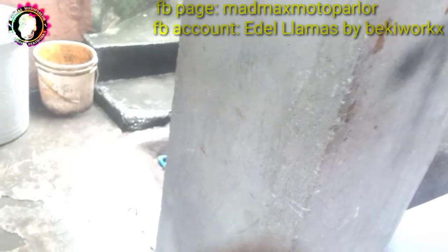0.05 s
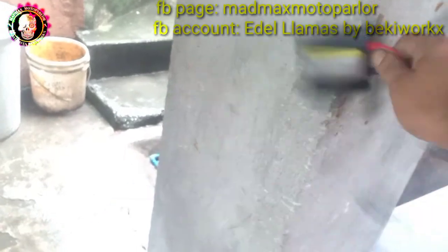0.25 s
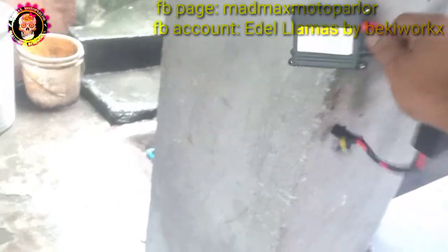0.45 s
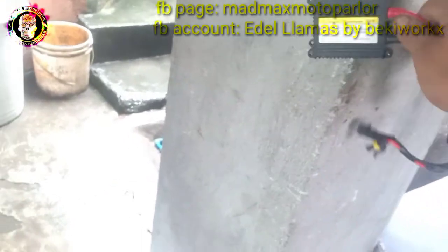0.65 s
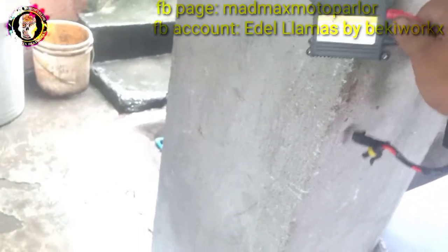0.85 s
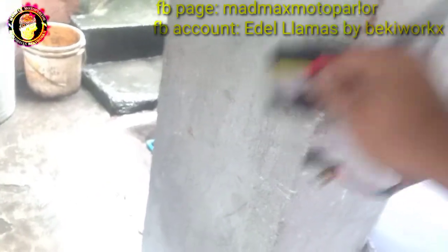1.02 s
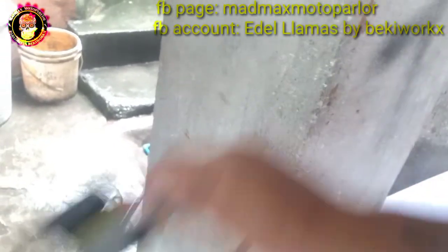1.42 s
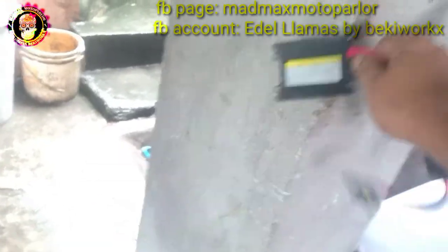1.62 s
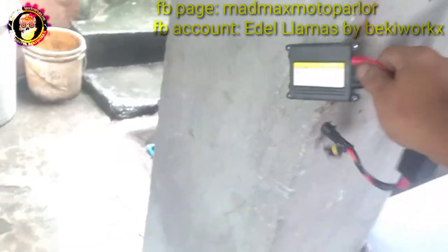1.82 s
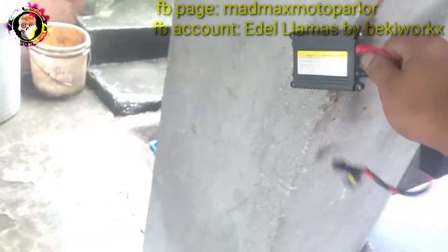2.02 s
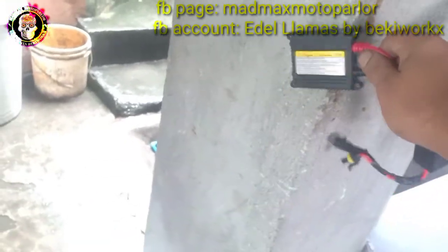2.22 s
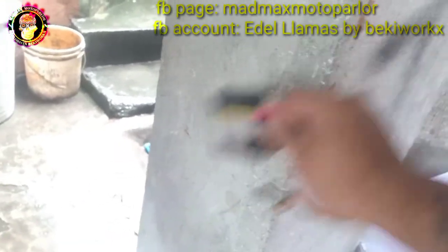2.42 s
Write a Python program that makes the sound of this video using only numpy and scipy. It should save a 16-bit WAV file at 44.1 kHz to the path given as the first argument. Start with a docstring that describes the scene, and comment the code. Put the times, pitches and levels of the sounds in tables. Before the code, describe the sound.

A small hard box is slammed twice onto a concrete slab in a quiet yard. Each sharp crack briefly overloads the close microphone and is followed by lighter rebound knocks, with a short echo and faint outdoor air.

```python
"""In a walled yard, a small hard-cased box, swung by its cable, is slammed twice onto a concrete slab.
Each slam lands edge first, then flat a few milliseconds later: the impacts excite the damped modes of the
case, crunch the concrete and overload the microphone with a low thud. The box rebounds and knocks
more lightly. Reflections ring on briefly over soft rustles, outdoor air, a distant hiss and a faint hum."""
import sys
import numpy as np
from scipy import signal
from scipy.fft import rfft, irfft, next_fast_len
from scipy.io import wavfile
from scipy.ndimage import uniform_filter1d

SR = 44100
rng = np.random.default_rng(int(sys.argv[2]) if len(sys.argv) > 2 else 0)


def int16_out(signal):
    """Quantize to a 16-bit WAV file."""
    q = np.round(np.clip(np.atleast_2d(signal).T, -1, 1) * 32767)
    wavfile.write(sys.argv[1], SR, q.astype(np.int16))


N = 112454
TIME = np.arange(N) / SR

# slam contacts, edge then face: t/s, ring/dB, crack/dB, crack tilt/(dB/octave), pitch ratio, left-right/dB
SLAM_CONTACTS = [(0.2190, -6.5, -24.5, 4, 1.2, -12.5), (0.2225, 7, -4.5, -3, 0.967, -7),
                 (1.5668, 0, -14, -2.5, 1.015, -8), (1.5719, 2, -11, 2.1, 1.019, -0.5)]
# modes of the slammed case: f/Hz, level/dB, t60/s, sign of first swing
SLAM_MODES = [(560, -21.5, 0.0065, 1), (859, -19, 0.032, 1), (1004.4, -3, 0.016, 1),
              (1235, -5.5, 0.022, -1), (1860, -22.5, 0.034, -1), (2077, -16.5, 0.0089, -1),
              (2383, -16, 0.02, -1), (2900, -24, 0.013, -1), (4376, -23, .008, 1)]
# crunch of the concrete: f/Hz, relative density/dB
CRACK_SPECTRUM = [(50, -25), (200, -2.5), (600, -2.5), (1500, 2), (2300, 4), (3500, -3.5), (4600, -1),
                  (6300, -5), (7800, -16), (11000, -19), (15500, -16)]
# a short, low thud as each slam overloads the microphone: t/s, level/dB, low-pass f/Hz
LOW_THUDS = [(0.2216, -14, 720), (1.5723, -6.5, 389)]
# the thud is loud on the right, faint and inverted on the left: left gain, right gain
THUD_CHANNEL_GAINS = [.25, -1.03]
# rebound contacts: t/s, ring/dB, tick/dB, pitch ratio, left-right/dB
REBOUND_CONTACTS = [(0.4012, -13.5, -44, 0.78, 4), (0.4103, 1, -24.5, 1.02, -10),
                    (0.4204, -11, -24.5, 1.03, 2), (0.4254, -15, -27.5, 1.09, -8),
                    (1.7355, -23, -52, .84, -1), (1.7717, -16, -34, .95, -4.5)]
# modes of the case struck on a corner: f/Hz, level/dB, t60/s, sign of first swing
REBOUND_MODES = [(370, -20, .01, 1), (850, -11.5, 0.014, 1), (1337, -2.5, 0.01, 1), (1690, -4, 0.0042, -1),
                 (2190, -18.5, 0.008, -1), (2670, -18.5, 0.0074, 1)]
# reflections from the ground and near walls: f/Hz, level/dB
EARLY_SPECTRUM = [(100, -20.5), (500, -17), (1100, -13), (2500, -3), (6000, -1), (15000, -5.5)]
# reverberation of the yard: f/Hz, level/dB
REVERB_SPECTRUM = [(100, -21), (400, -21), (700, -13), (1100, -6.5), (1500, -9), (2300, -4.5), (5000, -3),
                   (9000, -3), (15000, -2)]
# reverberation time: f/Hz, t60/s
REVERB_T60 = [(100, .4), (1100, 0.51), (2500, 0.51), (6000, 0.57), (15000, 0.25)]
# rustles after the slams: peak t/s, level/dB, rise width/s, fall width/s
RUSTLE_SWELLS = [(.80, -50.5, 0.031, 0.071), (1.252, -57.5, 0.043, 0.05), (2.33, -63.5, 0.032, 0.024)]
# rubbing noise, outdoor air and distant hiss: f/Hz, relative density/dB
RUSTLE_SPECTRUM = [(100, -21), (400, -0.5), (1000, -2.5), (2300, -4), (3500, -17.5), (6000, -27.5),
                   (8000, -40), (15000, -42)]
AIR_SPECTRUM = [(25, -14), (60, -8), (120, -1), (200, -5), (350, -3), (600, -6), (1200, -12), (2000, -10.5),
                (3300, -20), (5500, -25.5), (8000, -37.5), (15000, -38.5)]
FAR_HISS_SPECTRUM = [(300, -28), (1000, -3), (2300, 9), (3400, -11), (5500, -16), (7500, -26.5),
                     (14000, -17)]
# the background level dips after each loud slam: t/s, level/dB
BACKGROUND_GAIN = [(0, -56), (.6, -57.5), (1.1, -58), (1.5, -57.5), (2.0, -61), (2.55, -61)]
# swell of the distant hum: t/s, level/dB
HUM_ENVELOPE = [(1.3, -80.5), (1.45, -61), (1.85, -63.5), (2.0, -76.5)]
# diffuse sound at the two microphone ports: f/Hz, coherence
COHERENCE = [(60, 0.84), (200, .93), (550, .5), (1500, 0.0053), (15000, 0.047)]
# its level difference between the ports: f/Hz, left-right/dB
DIFFUSE_BALANCE = [(300, 0.1), (700, 1), (1100, -6), (2000, 0), (4500, 3.5), (15000, 1.5)]


def slam_rings():
    """Impact excitation: each contact of a slam sets the case ringing."""
    out, t = np.zeros((2, N)), TIME[:SR // 10]
    for s, ring_db, _, _, ratio, pan_db in SLAM_CONTACTS:
        add(out, s, pan(pan_db) * from_db(ring_db) * case_ring(SLAM_MODES, t, ratio))
    return out


def case_ring(modes, t, ratio, right_lag_s=.00005):
    """Modal superposition: damped sinusoids start together and reach the right port slightly later."""
    t = np.maximum(t - np.array([[0], [right_lag_s]]), 0)
    motion = sum(np.sign(swing) * from_db(db) * np.sin(2 * np.pi * hz * ratio * t) * decay(t, t60)
                 for hz, db, t60, swing in modes)
    return high_pass(motion, hz=586)  # a small body radiates bass poorly


def slam_cracks(t60=0.013):
    """Impact noise: each contact crunches the concrete in a short broadband burst."""
    out, t = np.zeros((2, N)), TIME[:SR // 10]
    for s, _, crack_db, tilt_db, _, _ in SLAM_CONTACTS:
        spectrum = [(hz, db + tilt_db * np.log2(hz)) for hz, db in CRACK_SPECTRUM]
        add(out, s, from_db(crack_db) * hiss(spectrum, len(t)) * decay(t, t60))
    return high_pass(out, hz=200)


def low_thuds():
    """Overload transient: a band-limited pulse gives a short, low thud at each slam."""
    out = np.zeros((2, N))
    for s, db, top_hz in LOW_THUDS:
        low_pass = signal.butter(2, top_hz, fs=SR, output="sos")
        pulse = signal.sosfilt(low_pass, signal.unit_impulse(SR // 10))
        thud = high_pass(pulse / pulse.max(), hz=75)
        add(out, s, from_db(db) * np.outer(THUD_CHANNEL_GAINS, thud))
    return out


def rebound_knocks():
    """Impact excitation at a corner: the rebounding box gives a higher, shorter ring and a tick."""
    out, t = np.zeros((2, N)), TIME[:SR // 10]
    for s, ring_db, tick_db, ratio, pan_db in REBOUND_CONTACTS:
        tick = hiss(CRACK_SPECTRUM, len(t)) * decay(t, t60=0.0091)
        ring = case_ring(REBOUND_MODES, t, ratio)
        add(out, s, pan(pan_db) * from_db(ring_db) * ring + from_db(tick_db) * tick)
    return high_pass(out, hz=170)


def in_yard(direct, early_db, reverb_db):
    """Convolution with the yard's impulse response adds reflections to the direct sound."""
    response = from_db(early_db) * early_reflections() + from_db(reverb_db) * reverberation()
    response = high_pass(response, hz=330)  # the open yard returns little bass
    return direct + signal.fftconvolve(direct.mean(axis=0, keepdims=True), response, axes=1)[:, :N]


def early_reflections(delay_s=0.003):
    """Scattering from the ground and nearest walls gives a quick, dense impulse response."""
    t = TIME[:SR]
    envelope = decay(t, t60=0.16) * (t > delay_s)
    return diffuse(EARLY_SPECTRUM, SR) * envelope / np.linalg.norm(envelope)


def reverberation(delay_s=0.0027, build_s=0.05):
    """Repeated reflection builds a diffuse field, each octave of which decays at its own rate."""
    t, hz = TIME[:SR], np.arange(SR // 2 + 1)
    noise, out = rfft(diffuse(REVERB_SPECTRUM, SR)), 0
    centres_hz = 125 * 2. ** np.arange(8)
    build = 1 - np.exp(-np.maximum(t - delay_s, 0) / build_s)
    for centre, share in zip(centres_hz, np.eye(len(centres_hz))):
        octave = irfft(noise * at_hz(np.c_[centres_hz, share], hz), SR)
        envelope = build * decay(t, at_hz(REVERB_T60, centre))
        out = out + octave * envelope / np.linalg.norm(envelope)
    return out


def rustles():
    """Friction noise rises and falls in soft Gaussian swells."""
    envelope = sum(from_db(db) * np.exp(-.5 * ((TIME - s) / np.where(TIME < s, rise, fall)) ** 2)
                   for s, db, rise, fall in RUSTLE_SWELLS)
    return envelope * hiss(RUSTLE_SPECTRUM, N)


def outdoor_air(far_db=-12.5, left_lead_s=0.00041):
    """Diffuse ambient noise, with a distant hiss placed to the left by its arrival-time difference."""
    far = hiss(FAR_HISS_SPECTRUM, N)[0]
    far_at_ports = np.array([far, np.roll(far, int(left_lead_s * SR))])
    air = hiss(AIR_SPECTRUM, N) + from_db(far_db) * far_at_ports
    return from_db(in_time(BACKGROUND_GAIN)) * air


def distant_hum(hz=210, waver_hz=4.5):
    """Random frequency modulation makes a faint, swelling tone waver."""
    waver = uniform_filter1d(rng.standard_normal(N), SR // 10)
    phase = 2 * np.pi * np.cumsum(hz + waver_hz * waver / waver.std()) / SR
    return np.sqrt(2) * from_db(in_time(HUM_ENVELOPE)) * np.sin(phase)


def diffuse(spectrum, size):
    """Diffuse field: noise from all sides is only partly coherent at the two ports."""
    hz = np.arange(size // 2 + 1) * SR / size
    mid, side = rfft(rng.standard_normal((2, size)))
    coherence = np.clip(at_hz(COHERENCE, hz), -.99, .99)
    sign = np.array([[1], [-1]])
    ports = (np.sqrt(1 + coherence) * mid + sign * np.sqrt(1 - coherence) * side) / np.sqrt(2)
    return irfft(ports * from_db(at_hz(spectrum, hz) + sign * at_hz(DIFFUSE_BALANCE, hz) / 2), size)


def hiss(spectrum, size):
    """Diffuse noise normalised to unit rms."""
    noise = diffuse(spectrum, next_fast_len(size))[:, :size]
    return noise / noise.std()


def from_db(db):
    """Amplitude ratio of a level in decibels."""
    return 10 ** (np.asarray(db) / 20)


def at_hz(points, hz):
    """Interpolation on a log-frequency axis."""
    f, values = np.transpose(points)
    return np.interp(np.log(np.maximum(hz, 1)), np.log(f), values)


def in_time(points):
    """Linear interpolation at every sample."""
    return np.interp(TIME, *np.transpose(points))


def pan(db):
    """Constant-power gains for a left-right level difference."""
    gains = from_db(np.array([[db / 2], [-db / 2]]))
    return gains / np.sqrt(np.mean(gains ** 2))


def decay(t, t60):
    """Exponential damping by 60 dB in t60 seconds."""
    return np.exp(-np.log(1000) * t / t60)


def add(out, s, sound):
    """Superposition of a sound starting at time s."""
    start = int(s * SR)
    out[:, start:start + sound.shape[1]] += sound[:, :N - start]


def high_pass(x, hz):
    """Second-order attenuation of the bass."""
    return signal.sosfilt(signal.butter(2, hz, "high", fs=SR, output="sos"), x)


def scene():
    """Superposition of the impacts, their reflections and the background."""
    rings = in_yard(slam_rings(), early_db=0.5, reverb_db=-6.0)
    cracks = in_yard(slam_cracks(), early_db=-0.06, reverb_db=-1.17)
    rebounds = in_yard(rebound_knocks(), early_db=3.8, reverb_db=-9)
    return rings + cracks + low_thuds() + rebounds + rustles() + outdoor_air() + distant_hum()


def record(dry):
    """Saturation in the microphone flattens the peaks; band limiting cuts the deep bass and the top."""
    overload, cutoff_hz = 0.82, 15750
    saturated = dry / (1 + (dry / overload) ** 6) ** (1 / 6)
    low_pass = signal.ellip(10, .1, 80, cutoff_hz, fs=SR, output="sos")
    return signal.sosfilt(low_pass, high_pass(saturated, hz=60.2))


dry = scene()
out = record(dry)
int16_out(out)
```